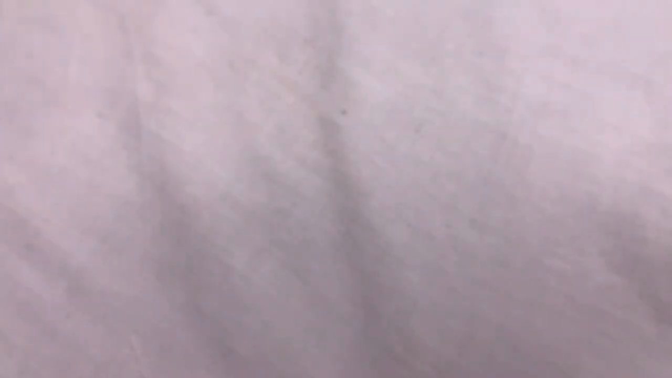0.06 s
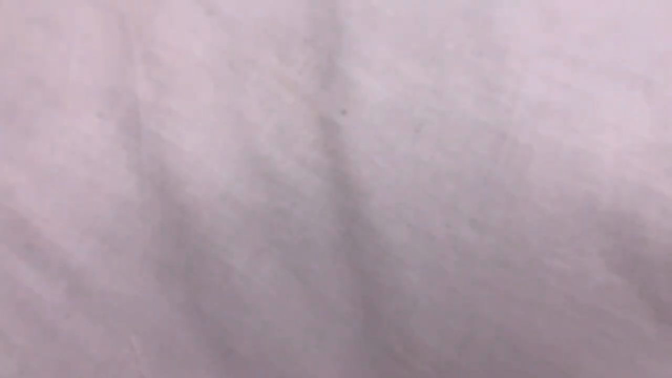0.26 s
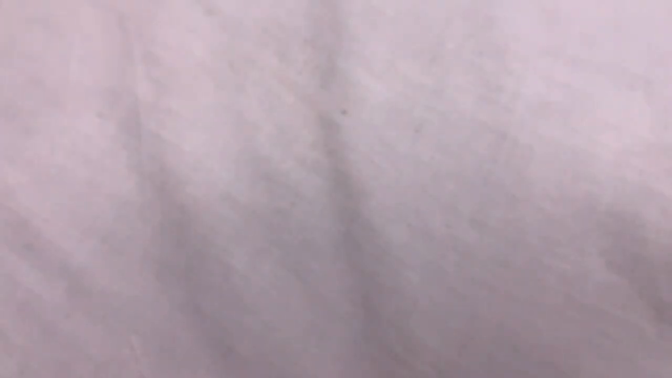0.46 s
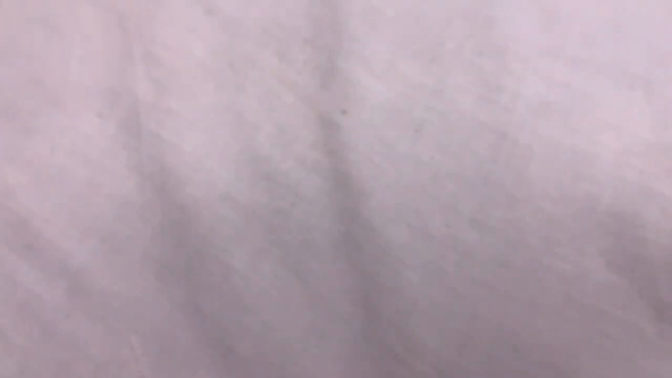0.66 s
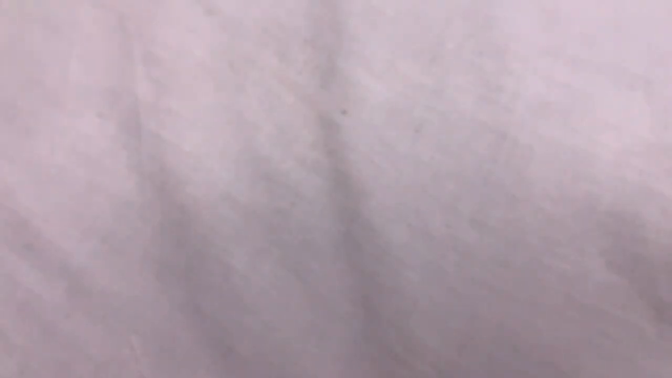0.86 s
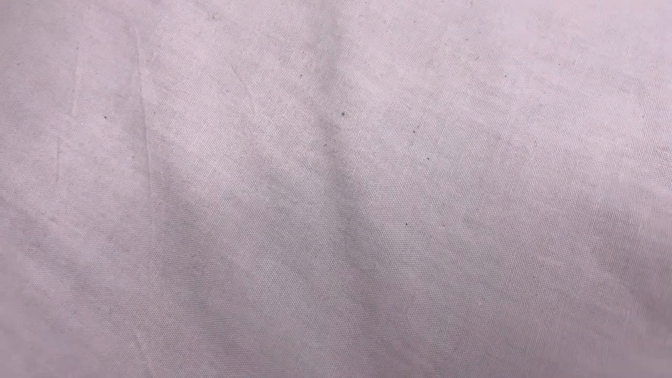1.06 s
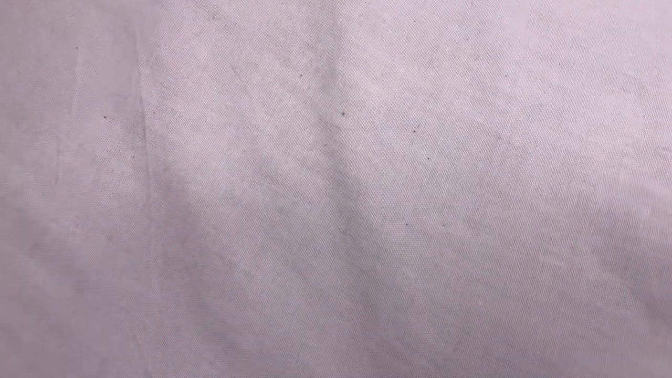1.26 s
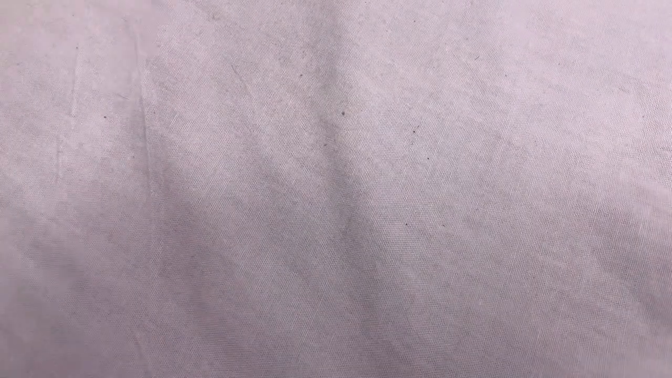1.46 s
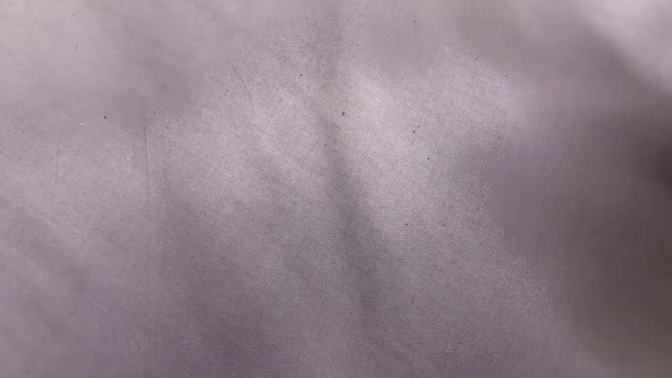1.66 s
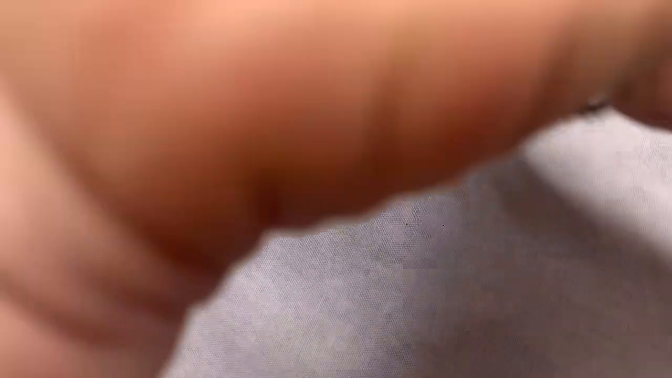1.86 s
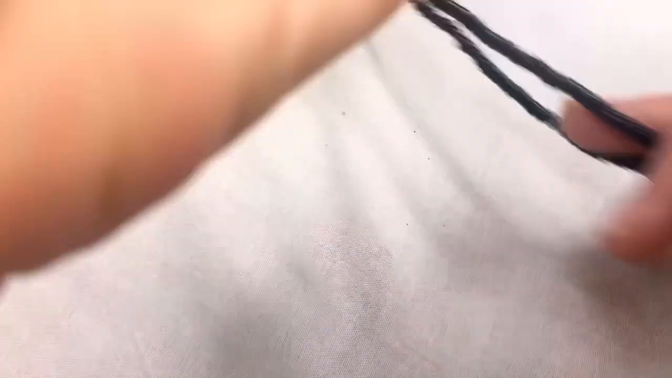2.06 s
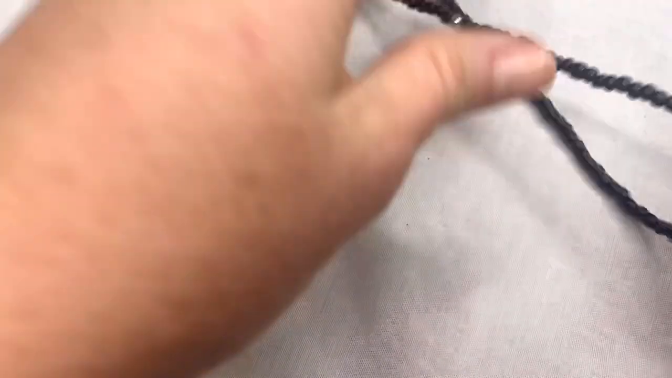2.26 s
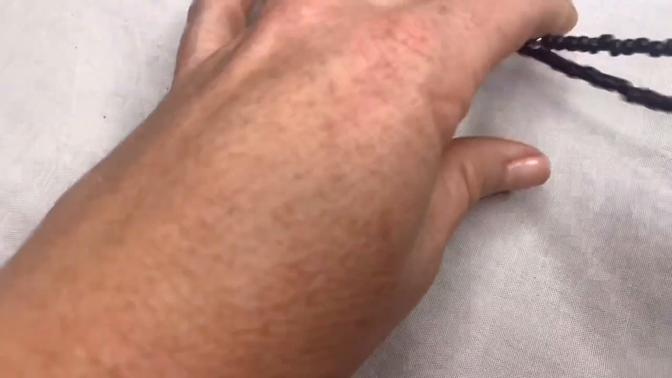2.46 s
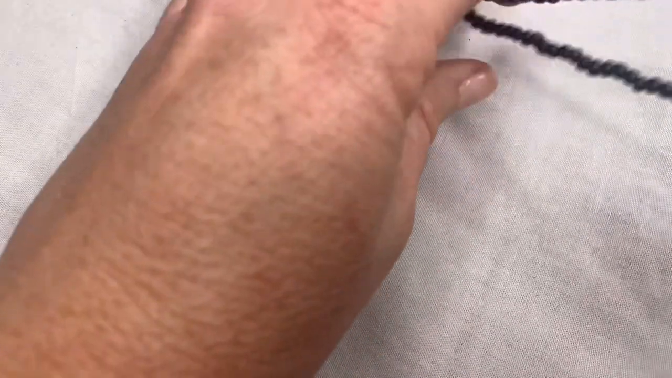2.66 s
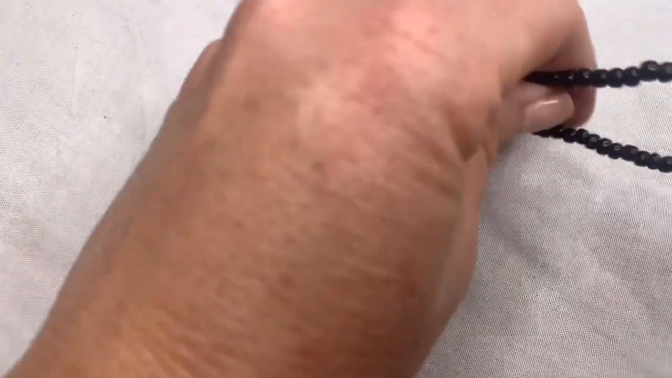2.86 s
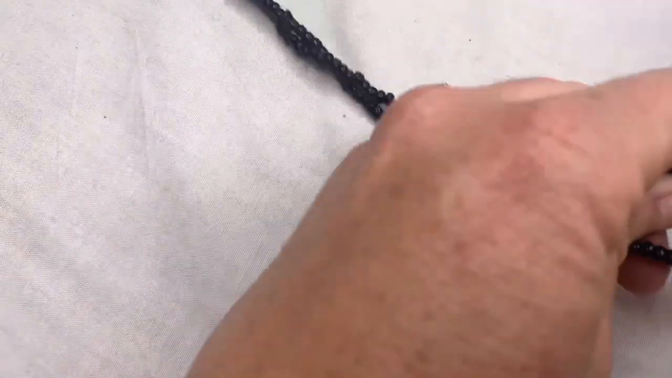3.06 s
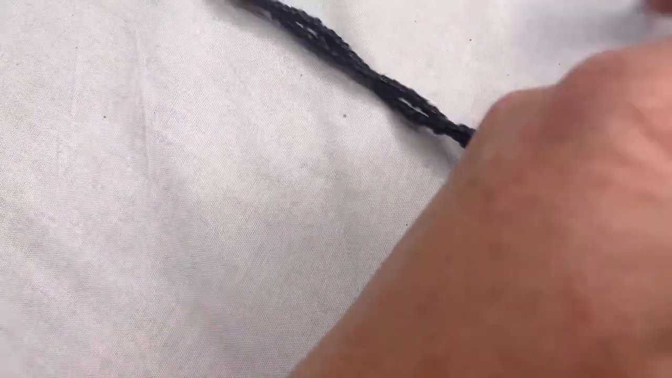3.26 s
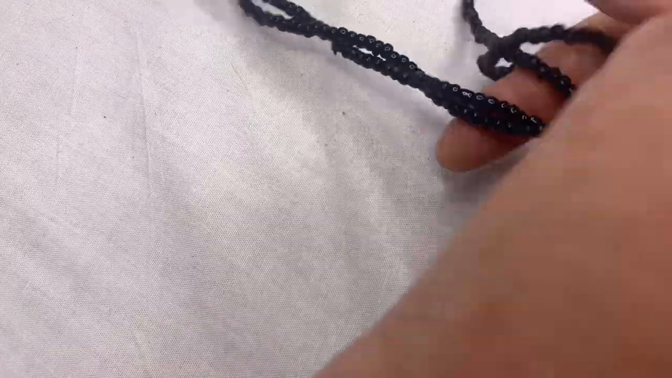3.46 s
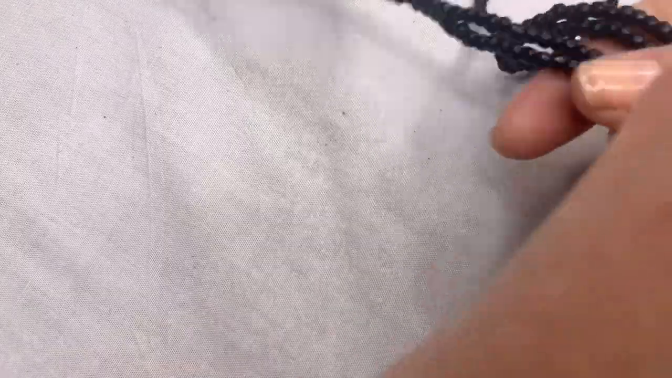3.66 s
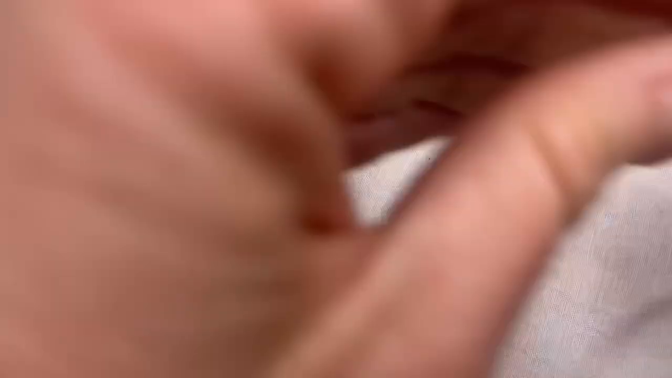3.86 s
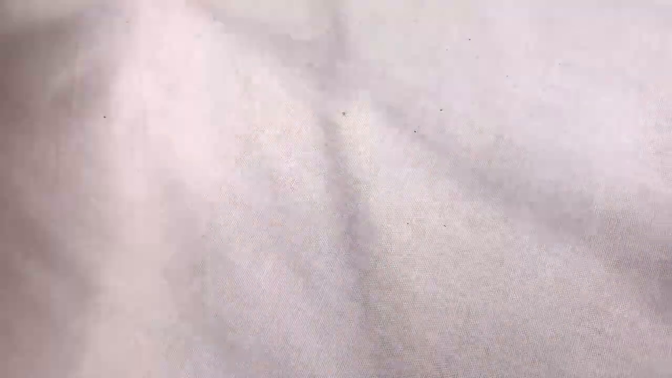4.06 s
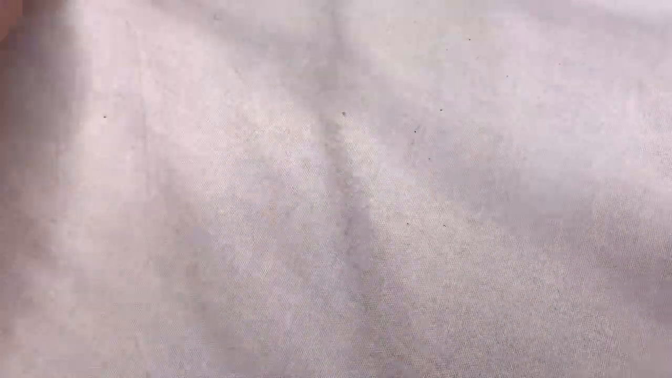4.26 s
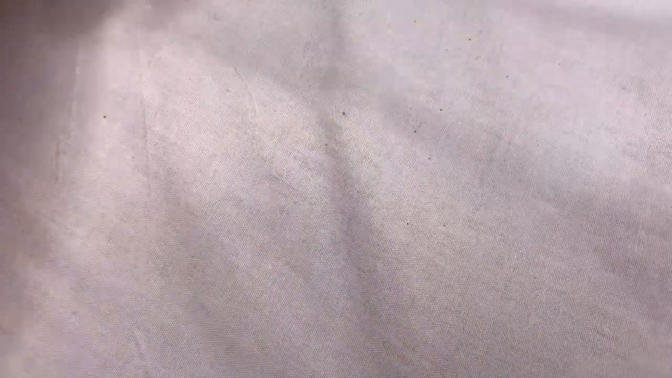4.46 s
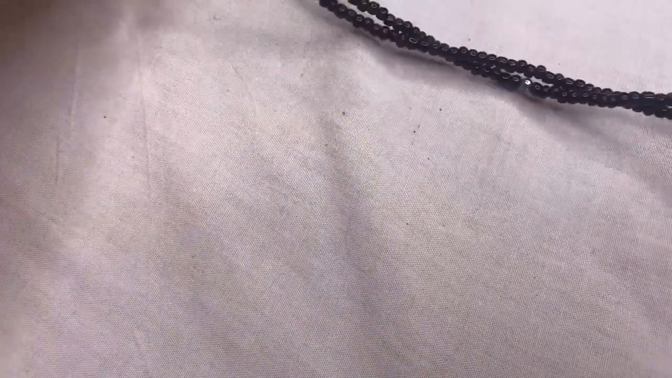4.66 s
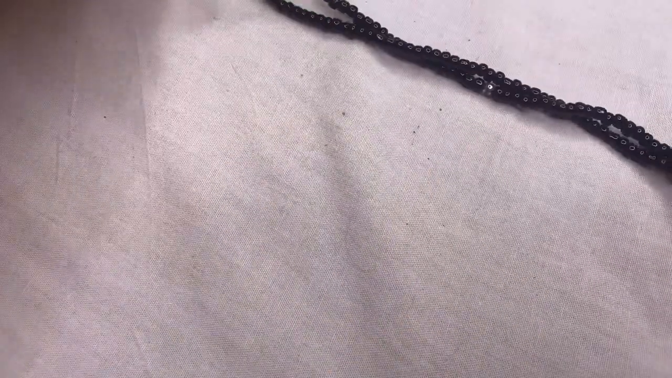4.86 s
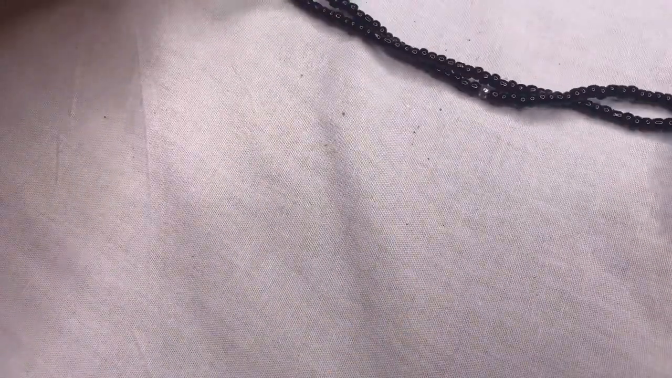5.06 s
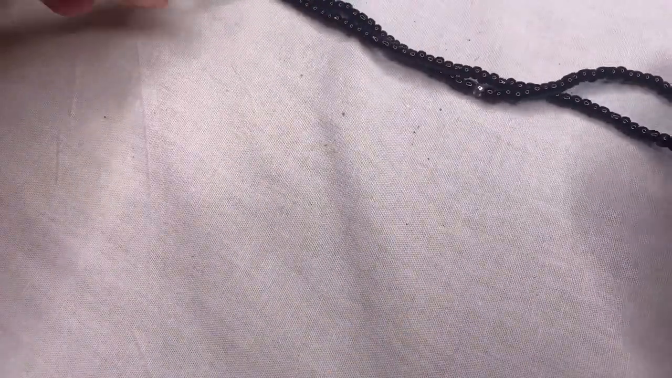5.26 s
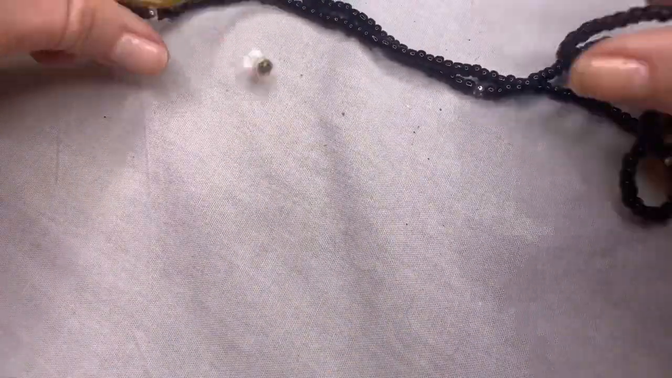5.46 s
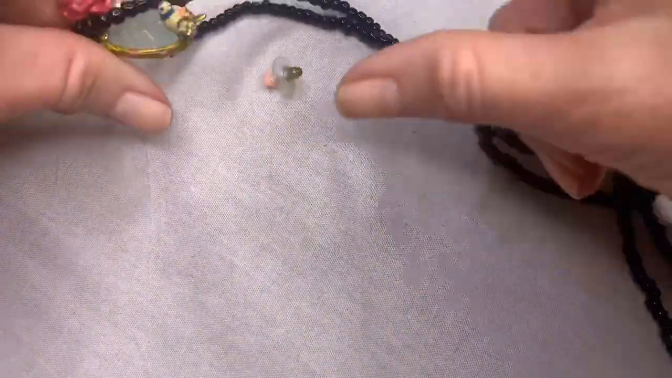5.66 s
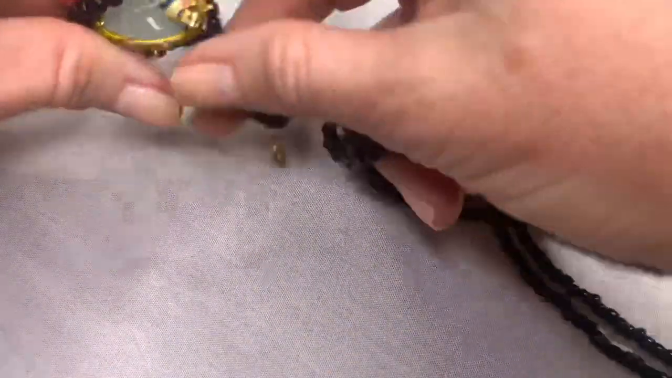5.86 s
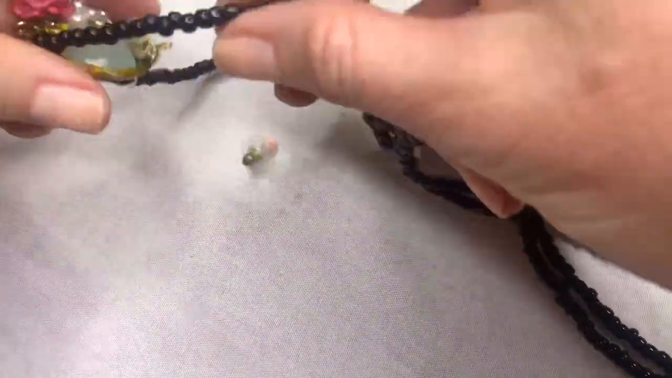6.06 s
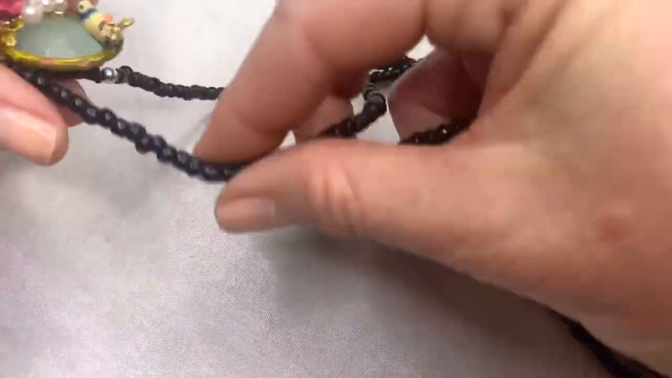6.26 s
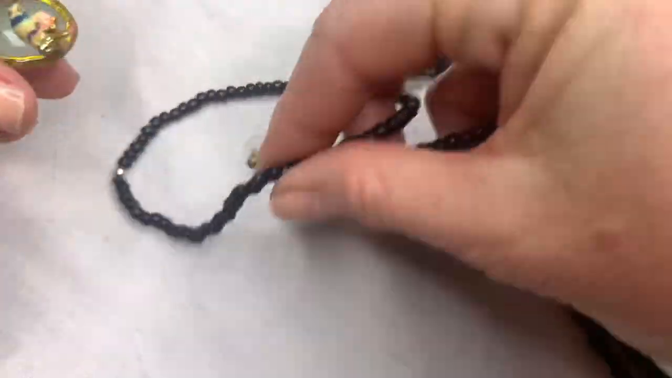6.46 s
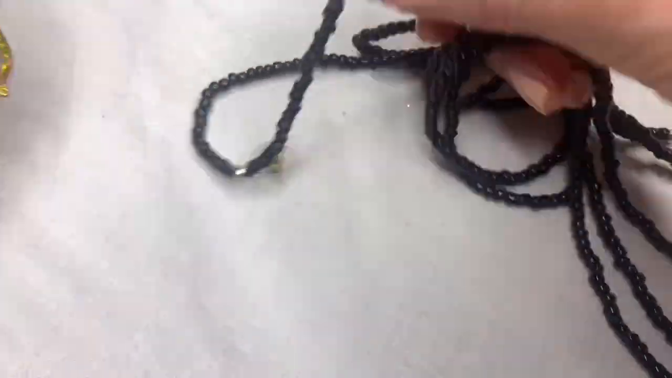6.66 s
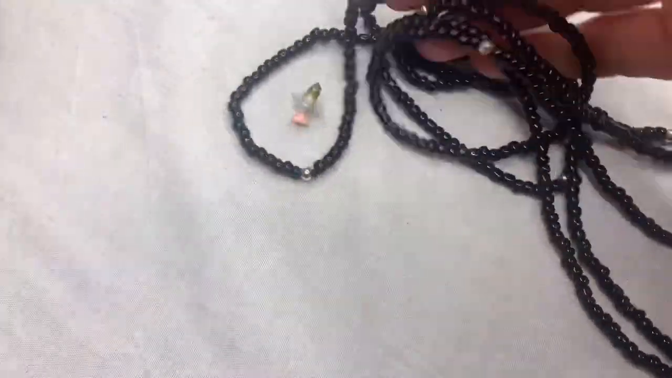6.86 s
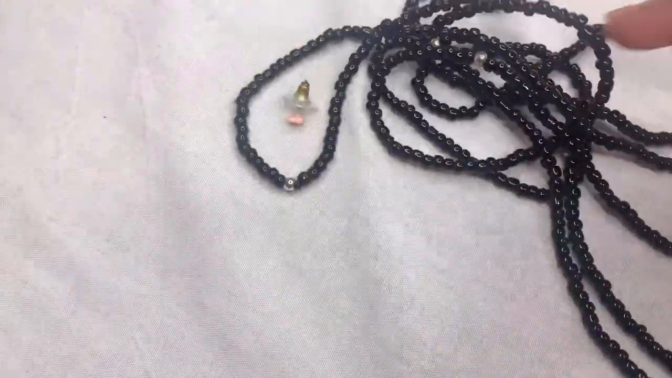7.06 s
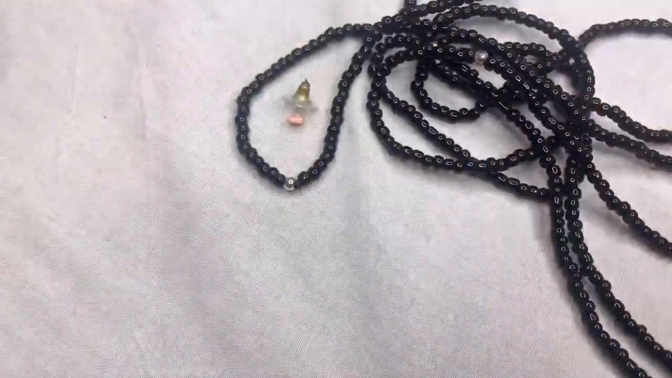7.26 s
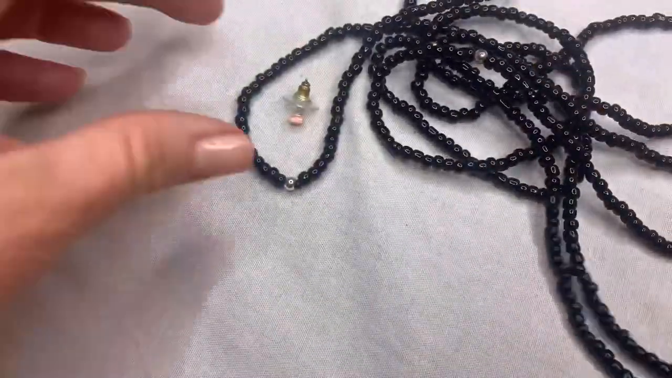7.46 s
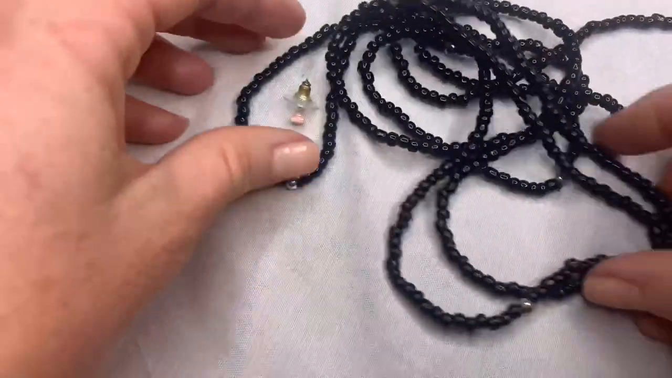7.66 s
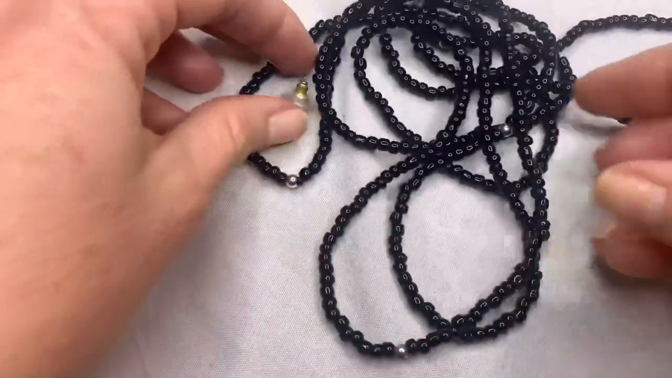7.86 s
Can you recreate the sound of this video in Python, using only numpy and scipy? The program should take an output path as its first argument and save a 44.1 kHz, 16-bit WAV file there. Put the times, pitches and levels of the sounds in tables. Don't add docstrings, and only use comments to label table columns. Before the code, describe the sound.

Hands rummage through bead strands and small metal trinkets in a thin-walled box, fizzing, ticking and knocking, then brush and thump a cloth-covered table.

```python
import sys
import numpy as np
from scipy import signal
from scipy.fft import rfft, irfft
from scipy.io import wavfile
from scipy.ndimage import uniform_filter1d

SR = 44100
rng = np.random.default_rng(int(sys.argv[2]) if len(sys.argv) > 2 else 0)


def wav_out(sig):
    wavfile.write(sys.argv[1], SR, np.round(np.clip(np.atleast_2d(sig).T, -1, 1) * 32767).astype(np.int16))


def voltage_ratio(level):
    return 10 ** (np.asarray(level, float) / 20)


N = 348566

# peak_s, fizz_db, rasp_db, rise_s, fall_s
PULLS = [(.166, -59, -2.5, 0.081, 0.2), (.62, -53.5, -10, 0.19, 0.78), (.86, -51, -13, 0.5, 0.27),
         (1.18, -50.5, -7, 1, 0.094), (1.6, -65.5, -9, .03, .2), (1.7, -59.5, -6, 0.14, 0.28),
         (2.06, -50, -5, 0.26, 0.25), (2.352, -53, -5, 0.034, 0.73), (2.88, -48.5, -4.5, 0.28, 0.25),
         (3.139, -48, -5, 0.13, 0.4), (3.71, -40, -11, 0.014, 0.012), (3.869, -47, -6, 0.31, 0.16),
         (4.088, -64, -4, 0.18, 0.074), (4.22, -62, -1.5, 0.098, 0.31), (1.4, -78, -12, 0.077, 0.092),
         (4.499, -75, -11, .3, 0.6), (5.101, -83, -16.5, 0.32, 0.28), (5.36, -66, -6, 0.41, 1),
         (5.7, -52, -10, 0.18, 0.24), (5.97, -67.5, -9, 0.36, 0.11), (6.25, -60, -20, 0.021, 0.11),
         (6.6, -68.5, -9.5, 0.37, 0.48), (6.9, -69.5, -8, 0.15, 0.44), (7.189, -62.5, -0.5, 0.031, 0.11),
         (7.55, -55.5, -22, 0.17, 0.58), (7.76, -57.5, -7, 0.58, 0.087)]
# peak_s, fizz_db, rasp_db, rise_s, fall_s
SLUMPS = [
    (2.031, -41, -20, 0.008, 0.035),
    (2.003, -50, -11, .015, 0.034),
    (2.897, -43, -10, 0.027, .015),
    (6.852, -53, -17, 0.026, 0.028),
    (3.877, -36.5, -23, 0.018, 0.018),
    (6.835, -53.5, -14, 0.032, 0.058),
]
PULL_DROP_DB, PULL_SHAPE, PULL_REST_DB = 37.5, 2, -84.5
# time_s, looseness_0_1
LOOSENESS = [(0, 0.4), (.4, 0.2), (.55, 0), (1.3, 0.31), (1.6, .15), (2.4, 0.2), (4.2, 0.2), (4.45, 0.2),
             (5.5, 0.5), (5.65, 0.04), (5.85, 0.5), (7.15, 0.25), (7.45, 0), (7.9, 1)]

# peak_s, wall_db, table_db, rise_s, fall_s
SLIDES = [(.12, -61, -59, .045, .15), (.27, -56.5, -53, 0.37, .4), (.8, -56.5, -61, 0.49, .18),
          (1.01, -64.5, -59, 0.18, .2), (1.181, -55, -56.5, 0.14, .25), (1.759, -52, -50.5, 0.1, .25),
          (1.98, -60.5, -50, 0.096, .2), (2.11, -57.5, -52.5, 0.41, .2), (2.38, -58.5, -59.5, 0.076, .5),
          (2.71, -64, -45.5, 0.29, .2), (2.94, -51, -45, 0.3, .25), (3.268, -50.5, -49.5, 0.55, .27),
          (3.73, -57, -49, 0.17, .15), (3.82, -47, -45.5, 0.22, .18), (4.02, -58.5, -53.5, 0.6, .3),
          (4.31, -54.5, -55.5, 0.31, .12), (4.5, -77, -68.5, 0.27, .6), (5.394, -55, -59, 0.042, .2),
          (5.662, -60, -53, 0.13, .4)]
# peak_s, wall_db, table_db, rise_s, fall_s
BRUSHES = [
    (5.08, -85, -56, 0.29, 0.093),
    (5.27, -65, -52, 0.045, 0.16),
    (6.3, -72, -82, 0.11, 0.28),
    (6.912, -68.5, -87, 0.3, 0.21),
    (7.01, -57.5, -55, 0.11, 0.1),
    (7.29, -63.5, -57, 0.82, 0.53),
    (7.5, -50, -40, 0.045, 0.095),
    (7.57, -64.5, -48.5, 0.12, 0.24),
    (7.7, -69, -42.5, 0.062, 0.39),
]
SLIDE_DROP_DB, SLIDE_SHAPE, SLIDE_REST_DB = 35.5, 1.39, -87.5
RIM_STEEPNESS, SLIDE_RIM_DB, BRUSH_RIM_DB = 1.06, -3.5, -8

# start_s, peak_db
TICKS = [(0.094, -49), (0.171, -25), (0.2229, -37), (0.615, -46), (0.6384, -52), (0.8963, -60),
         (0.9104, -31), (1.5878, -50), (1.645, -45), (1.782, -34), (1.7962, -34), (2.004, -37),
         (2.0283, -34), (2.2264, -42), (2.2604, -36.5), (2.2777, -41), (2.348, -31), (2.4085, -35),
         (2.442, -35), (2.563, -37), (2.6458, -21), (2.7128, -26), (2.7576, -29), (2.877, -28),
         (2.9284, -32), (2.9582, -27.5),
         (3.112, -34), (3.255, -33), (3.279, -23), (3.3253, -35), (3.4451, -37), (3.591, -45.5),
              (3.6566, -36), (3.704, -21), (3.7509, -27.5), (3.8055, -22.5), (3.8674, -28), (3.8801, -24),
              (4.2652, -47), (4.3323, -36), (4.4384, -43), (4.462, -33.5), (4.577, -44), (4.8554, -44.5),
              (4.951, -51.5), (5.0843, -47), (5.091, -47.5), (5.148, -46), (5.2087, -34), (5.226, -33),
              (5.2497, -39), (5.2817, -35), (5.3009, -39.5), (5.3587, -57), (5.3842, -33), (5.4415, -39),
         (5.6984, -34), (5.7319, -51), (5.7546, -30.5), (5.877, -28), (5.8947, -34), (5.9309, -39),
             (5.955, -35), (5.993, -25.5), (6.0054, -33.5), (6.0225, -40), (6.2512, -25), (6.4833, -46),
             (6.5006, -43), (6.5465, -41), (6.5715, -44), (6.5839, -36), (6.597, -42), (6.6276, -41),
             (6.6357, -38.5), (6.6545, -43),
         (6.7026, -38), (6.7233, -42), (6.7825, -45), (6.8844, -35), (6.977, -39.5), (7.093, -40.5),
                (7.402, -42.5), (7.461, -43.5), (7.5528, -33), (7.6226, -31.5), (7.638, -31.5),
                (7.752, -31.5), (7.7766, -28.5),
         (0.1101, -39), (0.1431, -50), (0.189, -41), (0.4903, -54), (0.5162, -41), (1.107, -34),
               (1.4187, -64), (1.6287, -47.5), (1.6781, -52), (1.9315, -45), (1.9455, -42), (1.9899, -51),
               (2.0842, -40), (2.2129, -46), (2.2333, -43), (2.591, -52), (2.6005, -54), (2.6763, -39),
               (2.7935, -41), (2.8084, -33), (3.0265, -46), (3.0584, -43), (3.1557, -36), (3.4281, -56),
               (3.4371, -40), (3.4765, -44), (3.6052, -44), (3.6646, -35), (3.9928, -48), (4.0397, -48),
               (4.2033, -54), (4.2278, -38), (4.4514, -41), (4.558, -52), (4.6947, -55), (4.7277, -58),
               (4.775, -54.5), (4.8953, -62), (4.9771, -51), (4.995, -53), (5.1073, -50), (5.4024, -48),
               (5.4271, -42), (5.452, -37), (5.4644, -37), (5.4704, -46), (5.4934, -44), (5.5214, -39),
               (5.5697, -50), (5.6052, -45),
         (5.8237, -46), (5.912, -44), (6.1659, -49), (6.4373, -53), (6.488, -44), (6.708, -45),
              (6.7555, -55), (6.7984, -43), (6.83, -37), (6.8424, -38), (6.852, -40), (6.8624, -45),
              (6.8797, -39), (6.8946, -39), (6.918, -46), (6.9296, -45), (6.9541, -45), (6.9914, -46),
              (7.0778, -42), (7.1317, -55), (7.1651, -57), (7.1875, -43), (7.2424, -56), (7.4112, -48),
              (7.439, -49), (7.5143, -55), (7.666, -37), (7.6909, -41), (7.874, -56)]
# start_s, peak_db
CLICKS = [(0.1424, -64), (1.7644, -57), (1.7824, -45), (2.0014, -42), (2.0281, -28.5), (2.2129, -50),
          (2.2584, -56), (2.7444, -54), (2.835, -47), (2.9282, -49), (2.942, -50), (3.0774, -59),
          (3.1116, -35), (3.1183, -41), (3.4451, -52), (3.707, -42), (3.7509, -39), (3.8666, -34),
          (4.2644, -58), (4.4534, -63), (4.463, -54), (5.2475, -66), (5.2824, -44.5), (5.3587, -59),
          (5.3857, -35.5), (5.9916, -62), (6.5465, -58), (6.6268, -64), (6.6354, -58)]
# start_s, peak_db, pitch_hz, t60_s
PINGS = [
    (0.637, -38.5, 9720, 0.11),
    (5.12, -54, 7500, 0.11),
    (6.2508, -30.5, 7780, 0.015),
    (6.2508, -38, 9840, 0.014),
    (5.754, -43, 8760, 0.24),
    (5.796, -52, 8920, 0.37),
    (5.822, -48.5, 11500, 0.1),
    (7.184, -46, 8660, 0.059),
    (7.19, -60, 8950, 0.22),
    (7.217, -40.5, 8070, 0.031),
]
JOSTLE_DB, JOSTLE_T60_S = -15.5, .03
TICK_SCATTER_RAD = .45

# start_s, peak_db, clack_db, crack_db
WALL_KNOCKS = [(0.107, -40.5, -24.5, -21), (0.155, -47.5, -13.5, -33), (0.235, -30.5, -41, -46),
               (0.256, -36, -51, -45), (0.761, -36, -10.5, 3.5), (1.1625, -29, -12.5, -43),
               (1.179, -49.5, 0, -14), (1.322, -50.5, -18, -41), (1.7585, -31, -9, -47),
               (1.95, -42, -18.5, -14), (2.103, -35.5, -10.5, -17), (2.643, -44, -42.5, -7.5),
               (2.866, -48, -4, -19), (2.927, -18, -26.5, -38), (3.279, -26.5, -21.5, -20.5),
               (3.656, -60.5, -4.5, -7), (3.704, -36.5, -18, -6.5), (3.752, -49.5, 1, 7),
               (3.812, -24, -15, -32.5), (3.866, -37.5, 1.5, 5.5), (4.213, -42.5, -21.5, -17),
               (4.303, -44.5, -9, -5.5), (5.12, -54, -11.5, -26), (5.629, -48, -18, -10),
               (5.645, -39, -21.5, -12), (5.817, -51.5, -13.5, -20), (6.965, -30, -40, -60)]
# start_s, peak_db, clack_db, crack_db, thud_hz
CORNER_KNOCKS = [(0.419, -42.5, -28.5, -47, 392), (1.706, -53.5, -5.5, -19, 424),
                 (1.779, -60.5, 8, -5, 616), (2.03, -51.5, -9.5, -25, 380), (2.092, -55.5, 2.5, 0, 463),
                 (2.717, -44.5, -19.5, -11, 302), (2.9251, -28.5, -26, -45, 334),
                 (3.249, -43, -6, -34, 292), (3.804, -26, -11, -26, 518), (3.857, -52.5, 5.5, -15.5, 490),
                 (5.383, -53, 7, 11, 454), (6.327, -60.5, -4.5, -29, 453), (6.918, -67, -3, -23, 600),
                 (7.039, -67, -5, -27, 186), (7.2, -67.5, 1, -10, 400)]
WALL_HZ, WALL_T60_S, CORNER_T60_S = 237.6, 0.059, 0.09

# start_s, peak_db, first_hz, swell_s, sag_s
THUMPS = [
    (5.013, -52.5, 382, 0.0046, 0.013),
    (5.254, -38, 482, 0.0051, 0.011),
    (7.486, -30.5, 473.6, 0.0049, 0.024),
    (7.513, -37.5, 482, 0.0048, 0.0112),
    (7.738, -50.5, 470, 0.0049, 0.022),
    (7.771, -39.5, 238.4, 0.0041, 0.025),
]

# pitch_hz, level_db, t60_s
WALL_MODES = [(226.6, 4.5, 0.13), (295.3, -2.5, 0.064), (347.5, -1.5, 0.042), (425.4, -3, 0.098),
              (466.5, -4, 0.19)]
# pitch_hz, level_db, t60_s
RIM_MODES = [(572, 6, 0.26), (626, 0, 0.12), (699, 2, 0.24), (794, -4, 0.26), (974.3, 8, 0.099),
             (1240, -3, 0.027), (1522, -10.5, 0.23)]
# pitch_hz, level_db, t60_s
TABLE_MODES = [(66.5, -22, 0.14), (73.6, -16.5, 0.023), (111, -1, 0.11)]

# freq_hz, level_db
FIZZ = [(3000, -15.5), (6000, -7), (7500, 1.5), (9000, 5.5), (12000, 2.5), (15700, 6.5), (16100, -38),
        (17000, -74)]
# freq_hz, level_db
RASP = [(500, 2), (1200, -16.5), (2200, 3), (3500, 7.5), (5500, 4), (7500, -10.5), (10000, -32.5)]
# freq_hz, level_db
CLACK = [(250, -24.5), (550, 2.5), (900, 1.5), (1500, -4.5), (2300, -8), (3500, -29)]
# freq_hz, level_db
HUSH = [(20, -11), (45, 2), (110, 1), (250, -6.5), (700, -17), (2000, -19), (6000, -20.5), (9000, -28),
        (15500, -33.5), (16500, -44)]
HUSH_DB = -74

# freq_hz, right_lead_rad, wander_rad, left_minus_right_db; around 8.5
# and 13.4 kHz the sides stay nearly opposite in phase
PORTS = [(0, 0, .5, 0), (200, -.22, .2, 0), (400, -.7, .4, 0), (700, -1.1, .75, 4.5),
         (1100, -1.5, 1.2, 2.5), (1500, -2.1, 1.7, 1), (2500, -3.8, 1.8, 0), (5500, -1.5, 1.8, -1),
         (7200, 1.6, .9, 0), (8000, 3.07, .09, 0), (9000, 3.22, .09, 0), (10000, 5.3, .8, 0),
         (11200, 6.3, .2, 0), (12300, 8, .8, 0), (12900, 9.35, .09, 0), (13900, 9.5, .09, 0),
         (14800, 11.4, .8, 0), (15500, 12.55, .2, 0)]
PORT_AIR_DB, PORT_AIR_HZ = -81., 88.7


def evened(x):
    return x / np.sqrt(np.mean(x ** 2) + 1e-20)


def coloured(x, spectrum):
    hz, db = np.transpose(spectrum)
    log_hz = np.log(np.fft.rfftfreq(512, 1 / SR) + 1)
    response = irfft(voltage_ratio(np.interp(log_hz, np.log(hz), db)))
    return signal.oaconvolve(x, np.roll(response, 256) * np.hanning(512), "same")


def ring(hz, t60_s, count, phase_rad=0):
    t = np.arange(count) / SR
    return voltage_ratio(-60 * t / max(t60_s, .001)) * np.sin(2 * np.pi * hz * t + phase_rad)


def resonate(drive, modes):
    response = sum(voltage_ratio(db) * ring(hz, t60_s, 12000) / np.sqrt(t60_s) for hz, db, t60_s in modes)
    return signal.oaconvolve(drive, response / np.linalg.norm(response))[:N]


def add(mix, start_s, sound):
    part = mix[max(round(start_s * SR), 0):][:len(sound)]
    part += sound[:len(part)]


def contacts(per_s, spread_db):
    draw = rng.random(N)
    size = np.minimum(rng.exponential(1, N), 5)
    return evened((draw < per_s / SR) * voltage_ratio(spread_db * size) * rng.standard_normal(N))


def clumps(ms, depth_db):
    size = round(ms * SR / 1000)
    slow = uniform_filter1d(uniform_filter1d(rng.standard_normal(N), size), size)
    return voltage_ratio(depth_db * evened(slow))


def strokes(peak_s, top_db, rise_s, fall_s, drop_db, shape, rest_db):
    t = np.arange(0, N / SR, 1 / 500)[:, None]
    away = np.where(t < peak_s, (peak_s - t) / abs(rise_s), (t - peak_s) / abs(fall_s))
    power = (voltage_ratio(top_db - drop_db * away ** shape) ** 2).sum(axis=1) + voltage_ratio(rest_db) ** 2
    return np.interp(np.arange(N) / SR, t[:, 0], np.sqrt(power))


def rummage():
    peak_s, fizz_db, rasp_db, *sides_s = np.transpose(PULLS + SLUMPS)
    fade = PULL_DROP_DB, PULL_SHAPE, PULL_REST_DB
    pull = strokes(peak_s, fizz_db, *sides_s, *fade)
    scrape = strokes(peak_s, fizz_db + rasp_db, *sides_s, *fade)
    time_s, looseness = np.transpose(LOOSENESS)
    loose = np.clip(np.interp(np.arange(N) / SR, time_s, looseness), 0, 1)
    flow = clumps(ms=14.0, depth_db=1.64 + 6.2 * loose)
    single = contacts(per_s=150., spread_db=2.0)
    decay = np.exp(-np.log(1000) / (.006 * SR))
    splash = evened(signal.lfilter([1], [1, -decay], abs(single)) * rng.standard_normal(N))
    packed = contacts(per_s=12000.0, spread_db=-2.0) * flow
    hits = np.sqrt(1 - loose) * packed + np.sqrt(loose) * splash
    dull_hits = contacts(per_s=9000.0, spread_db=2.5) * np.sqrt(flow)
    fizz = evened(coloured(hits, FIZZ)) * pull * voltage_ratio(4.5)
    rasp = evened(coloured(dull_hits, RASP)) * scrape * voltage_ratio(-3.5)
    return fizz + rasp


def slides():
    peak_s, wall_db, table_db, *sides_s = np.transpose(SLIDES + BRUSHES)
    rim_db = wall_db + np.repeat([SLIDE_RIM_DB, BRUSH_RIM_DB], [len(SLIDES), len(BRUSHES)])
    wall = strokes(peak_s, wall_db, *sides_s, SLIDE_DROP_DB, SLIDE_SHAPE, SLIDE_REST_DB)
    table = strokes(peak_s, table_db, *sides_s, SLIDE_DROP_DB, SLIDE_SHAPE, SLIDE_REST_DB)
    rim = strokes(peak_s, rim_db, *sides_s, RIM_STEEPNESS * SLIDE_DROP_DB, SLIDE_SHAPE, SLIDE_REST_DB - 26)
    drag = contacts(per_s=1300.0, spread_db=2.0) * clumps(ms=14.0, depth_db=-0.5)
    shake = resonate(drag * wall * voltage_ratio(1.8), WALL_MODES)
    rattle = resonate(drag * rim * voltage_ratio(-7.5), RIM_MODES)
    thrum = resonate(rng.standard_normal(N) * table * voltage_ratio(-2.0), TABLE_MODES)
    return shake + rattle + thrum


def hush():
    hz, db = np.transpose(HUSH)
    log_hz = np.log(np.fft.rfftfreq(N, 1 / SR) + 1)
    shape = voltage_ratio(np.interp(log_hz, np.log(hz), db))
    return voltage_ratio(HUSH_DB) * evened(irfft(rfft(rng.standard_normal(N)) * shape, N))


def ticks():
    out = np.zeros(N)
    hits = TICKS
    onset = np.sin(np.pi / 2 * np.minimum(np.arange(1000) / 16., 1)) ** 2
    fade = voltage_ratio(JOSTLE_DB - 60 * np.arange(1000) / SR / JOSTLE_T60_S)
    for start_s, db in hits:
        modes = sum(ring(8400 + 7500 * u, .007, 1000, 9 * v) for u, v in rng.random((10, 2)))
        snap = sum(ring(4200 + 3200 * u, 0.005, 1000) for u in rng.random(4))
        jostle = fade * evened(coloured(rng.standard_normal(1000), FIZZ))
        add(out, start_s, voltage_ratio(db - 5.0) * onset * (modes + 0.17 * snap + jostle))
    for start_s, db in CLICKS:
        modes = sum(ring(2900 + 4500 * u, 0.013, 1000, 9 * v) for u, v in rng.random((8, 2)))
        add(out, start_s, voltage_ratio(db - 7.0) * onset * modes)
    for start_s, db, hz, t60_s in PINGS:
        add(out, start_s, voltage_ratio(db) * ring(hz, t60_s, 8000))
    return out


def knocks():
    blows = [(*row, WALL_HZ, WALL_T60_S) for row in WALL_KNOCKS]
    blows += [(*row, CORNER_T60_S) for row in CORNER_KNOCKS]
    thud, clack, crack, shake, rattle = np.zeros((5, N))
    t = np.arange(4000) / SR
    for start_s, db, clack_db, crack_db, hz, t60_s in blows:
        rise_s = 0.0011 + 0.000075 * max(-clack_db, 0)
        rise = 1 - np.exp(-(t / rise_s) ** 2)
        add(thud, start_s, voltage_ratio(db + 5.5) * rise * ring(hz, 0.5 * t60_s, 4000))
        add(shake, start_s + 0.0018, voltage_ratio(db + 0.15 * clack_db - 4.5) * np.hanning(40))
        add(rattle, start_s + 0.00215, voltage_ratio(db + clack_db + 5.5) * np.hanning(20))
        settle = 2.9 * voltage_ratio(-60 * t / 0.004) + voltage_ratio(-60 * t / t60_s) + 0.48 * voltage_ratio(-16.0 * t / t60_s)
        add(clack, start_s, voltage_ratio(db + clack_db + 14.5) * settle * rise * rng.standard_normal(4000))
        add(crack, start_s, voltage_ratio(db + crack_db - 2.0) * settle * rise * rng.standard_normal(4000))
    rings = resonate(shake, WALL_MODES) + resonate(rattle, RIM_MODES)
    return rings + thud + coloured(clack, CLACK) + coloured(crack, RASP)


def thumps():
    out, t = np.zeros(N), np.arange(6000) / SR
    for start_s, db, first_hz, swell_s, sag_s in THUMPS:
        pitch_hz = 110.5 + (first_hz - 100.) / (1 + (t / (swell_s + sag_s)) ** 4)
        turn = 2 * np.pi * np.cumsum(pitch_hz) / SR
        pulse = (t / swell_s) ** 2 * np.exp(2 - 2 * t / swell_s)
        tail = 0.44 * (1 - np.exp(-t / sag_s)) * np.exp(-t / 0.059)
        others = 0.55 * np.sin(0.433 * turn) + 0.34 * np.sin(1.3 * turn)
        others += 0.045 * np.sin(2.21 * turn) + 0.052 * np.sin(3.2 * turn)
        add(out, start_s, voltage_ratio(db) * ((pulse + tail) * np.sin(turn) + pulse * others))
    return out


def room(x, t60_s, wet_db):
    tail = rng.standard_normal(8000) * voltage_ratio(-60 * np.arange(8000) / SR / t60_s)
    return x + voltage_ratio(wet_db) * signal.oaconvolve(x, tail / np.linalg.norm(tail))[:N]


def ports(x, scatter_rad):
    hz, t, z = signal.stft(x, SR, nperseg=256, noverlap=192)
    at_hz, *columns = np.transpose(PORTS)
    lead, wander, tilt_db = (np.interp(hz, at_hz, c)[:, None] for c in columns)
    drift = rng.standard_normal((len(hz), len(t)))
    drift = uniform_filter1d(uniform_filter1d(drift, size=4, axis=0), size=30, axis=1)
    drift = evened(drift)
    phase = lead + (wander + scatter_rad) * drift * (.4 + .6 * abs(drift))
    half = voltage_ratio(tilt_db / 2) * np.exp(-.5j * phase)
    return signal.istft(np.array([z * half, z / half]), SR, nperseg=256, noverlap=192)[1][:, :N]


def scene():
    near = rummage() + slides() + knocks() + thumps()
    no_bass = signal.butter(3, 60., "high", fs=SR, output="sos")
    near = signal.sosfilt(no_bass, near)
    mix = ports(room(near, t60_s=.1, wet_db=-15.) + hush(), 0)
    mix = mix + ports(room(ticks(), t60_s=.1, wet_db=-15.), TICK_SCATTER_RAD)
    low = signal.butter(2, PORT_AIR_HZ, fs=SR, output="sos")
    air = signal.sosfilt(low, rng.standard_normal((2, N)))
    return mix + voltage_ratio(PORT_AIR_DB) * evened(air)


def roll_off(x):
    return signal.sosfilt(signal.butter(12, 17100, fs=SR, output="sos"), x)


def record(dry):
    edge = signal.firwin(201, 16500, window=("kaiser", 5), fs=SR)
    return roll_off(signal.oaconvolve(dry, edge[None], "same"))


dry = scene()
out = record(dry)
wav_out(out)
```